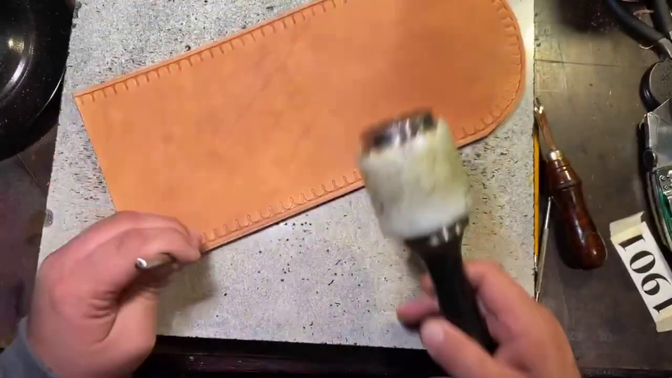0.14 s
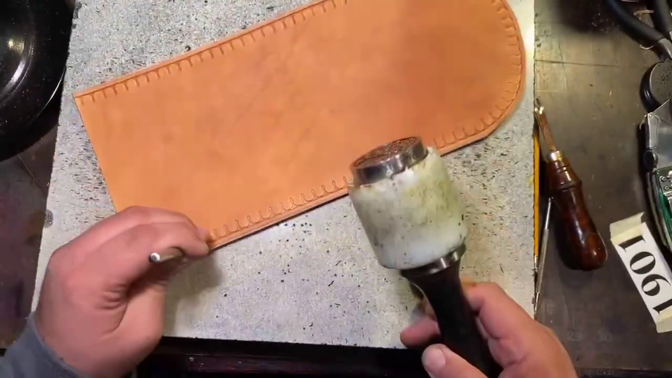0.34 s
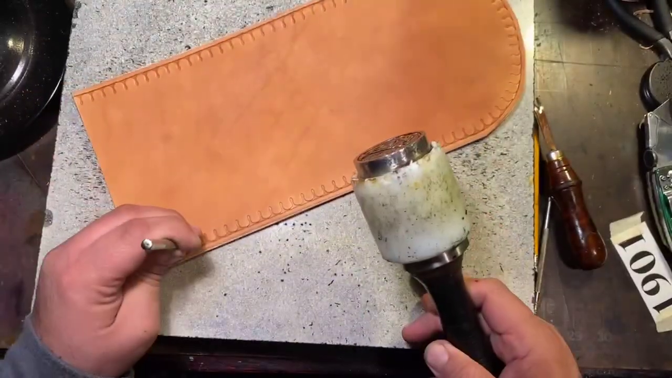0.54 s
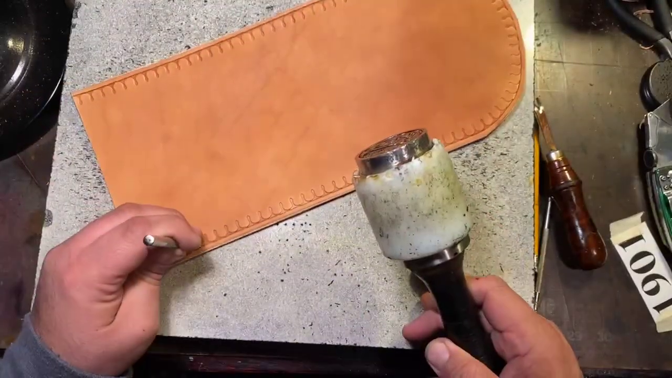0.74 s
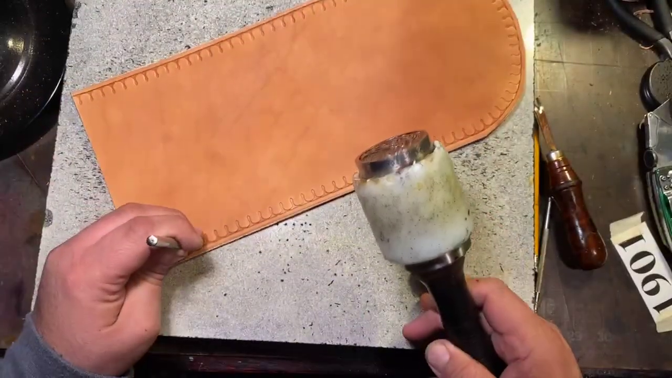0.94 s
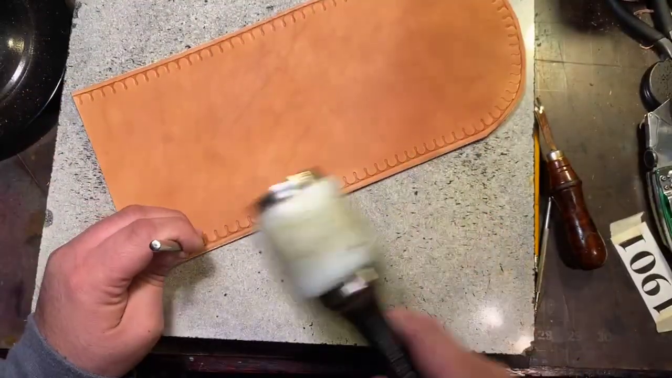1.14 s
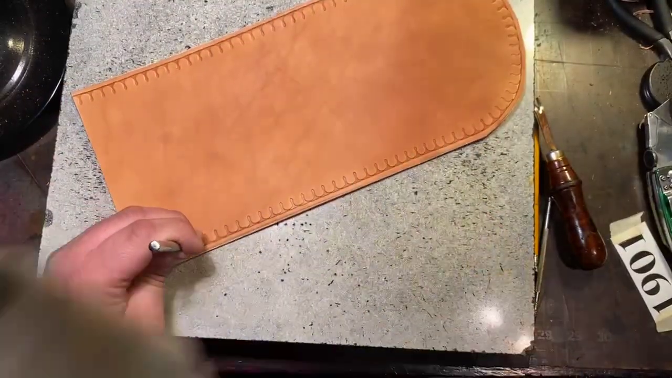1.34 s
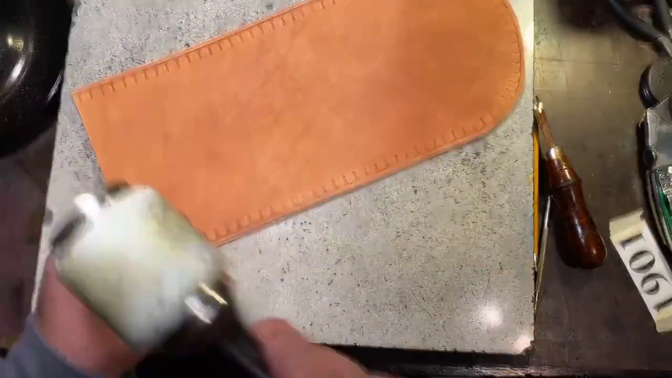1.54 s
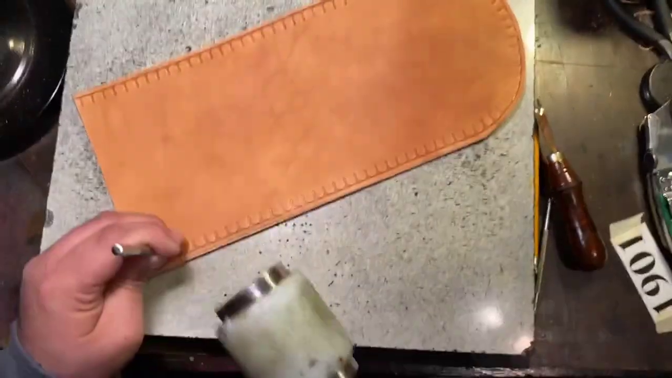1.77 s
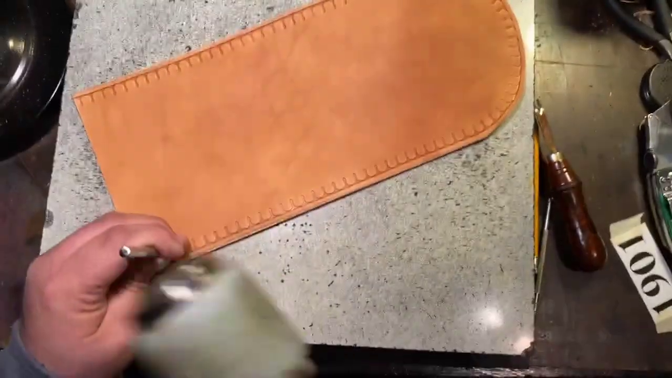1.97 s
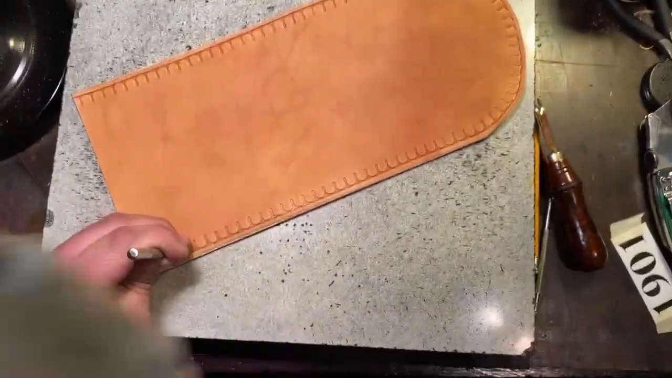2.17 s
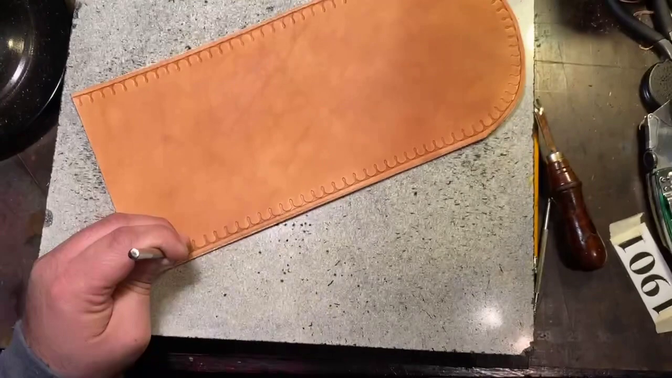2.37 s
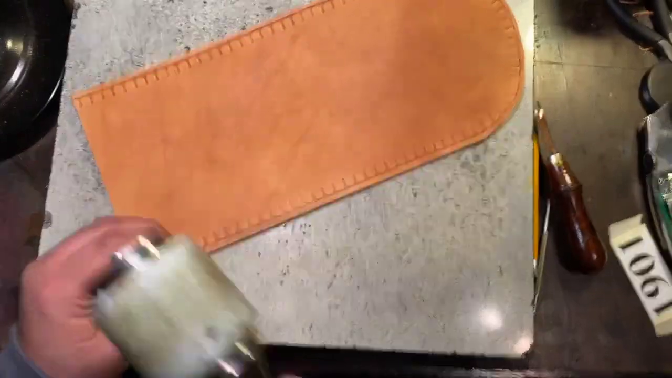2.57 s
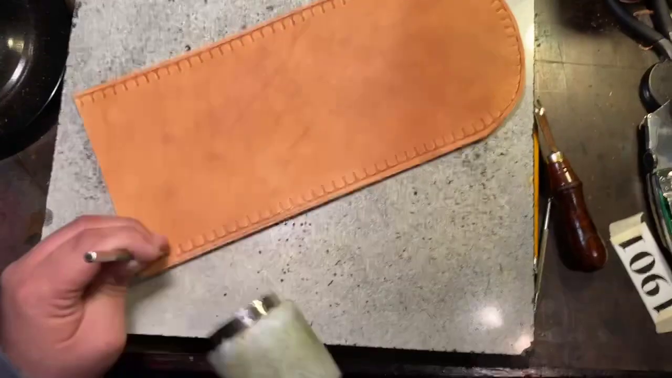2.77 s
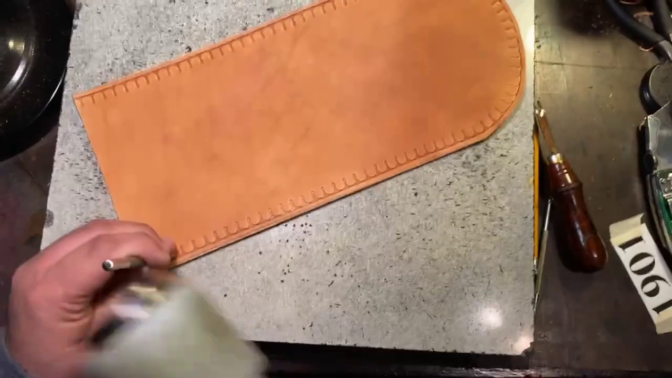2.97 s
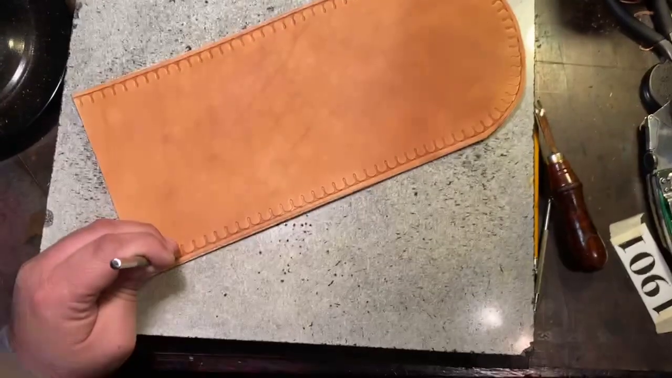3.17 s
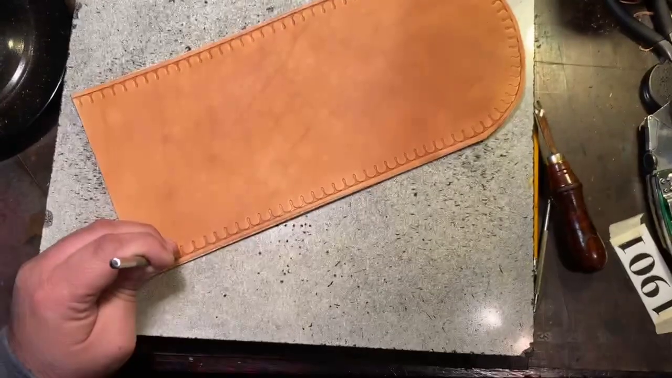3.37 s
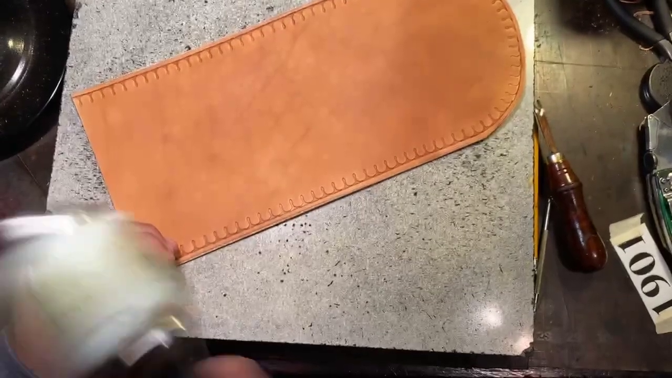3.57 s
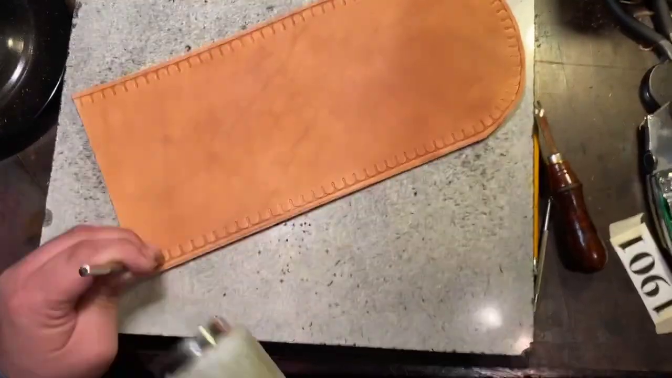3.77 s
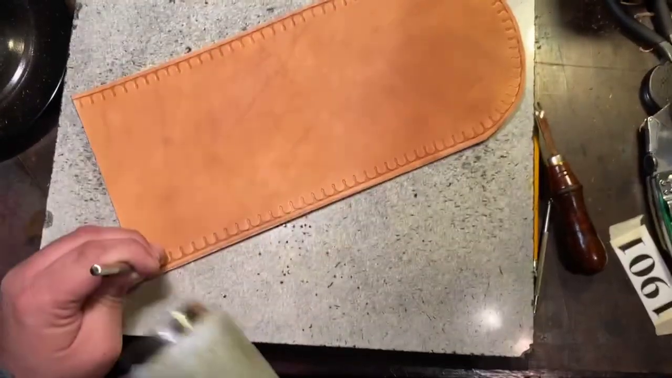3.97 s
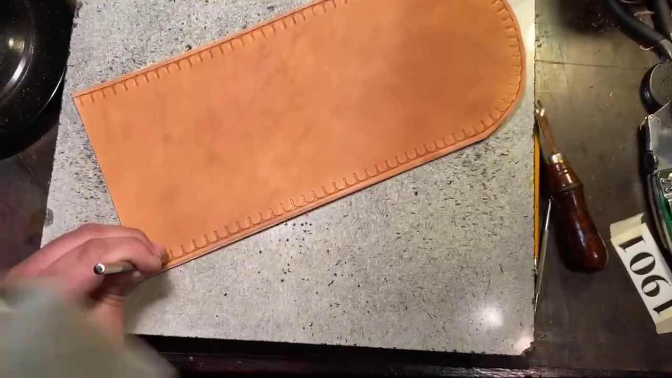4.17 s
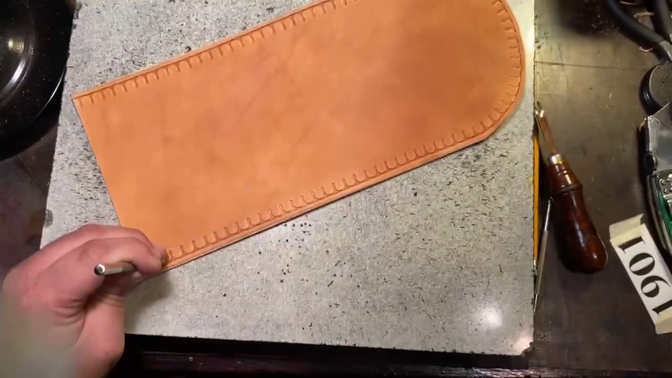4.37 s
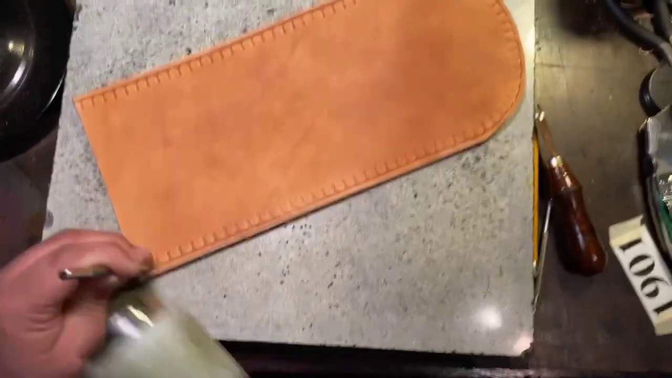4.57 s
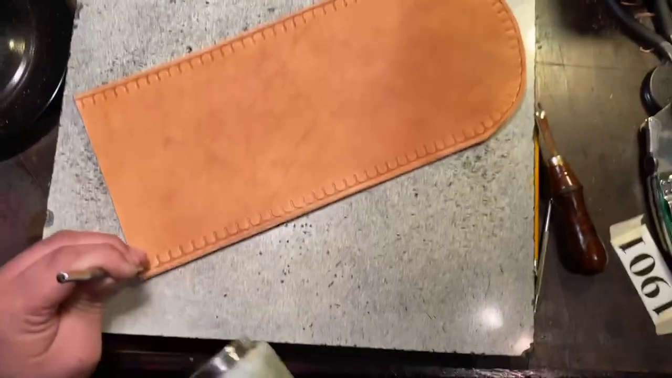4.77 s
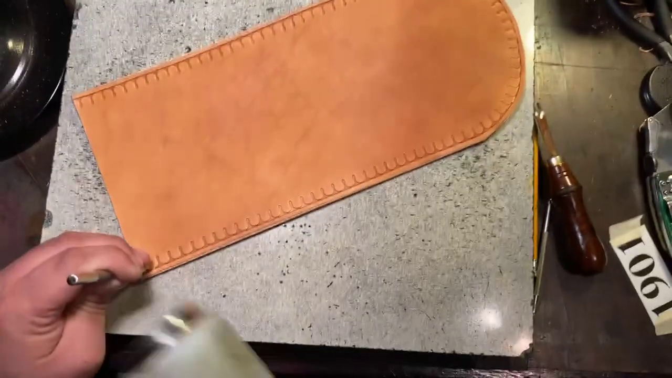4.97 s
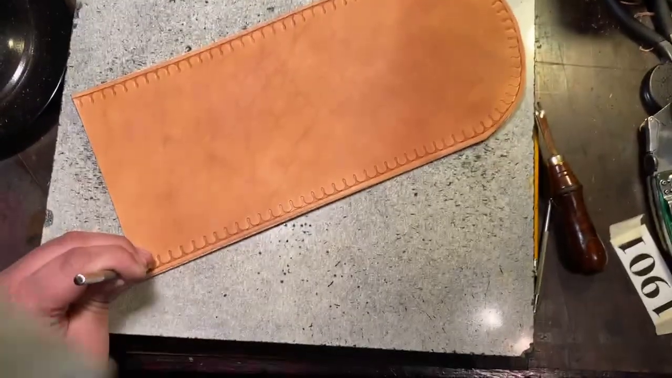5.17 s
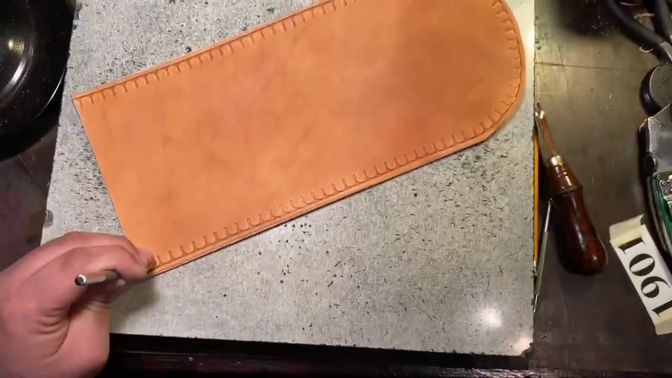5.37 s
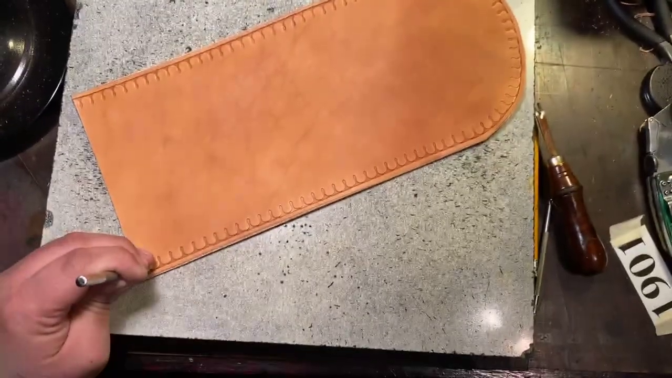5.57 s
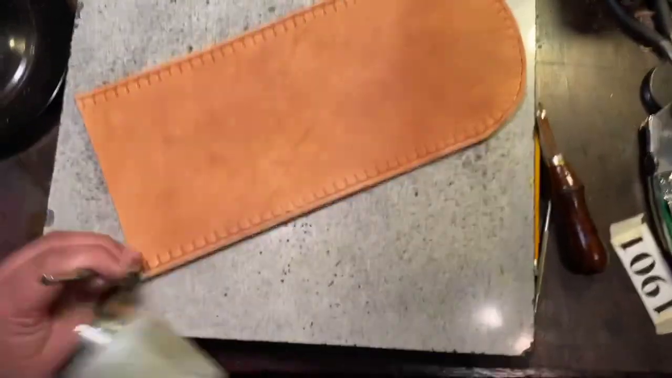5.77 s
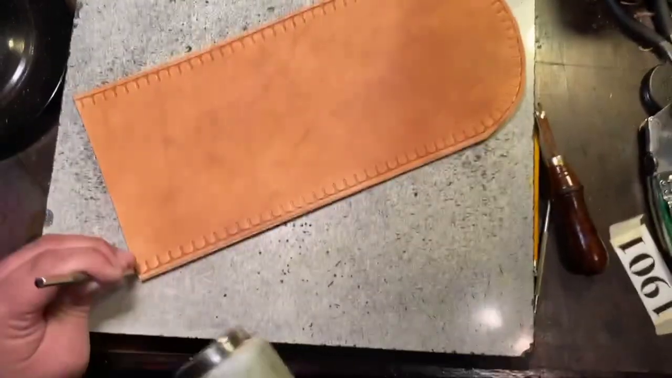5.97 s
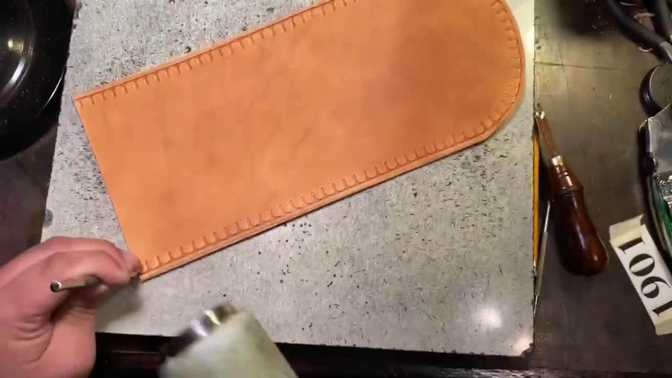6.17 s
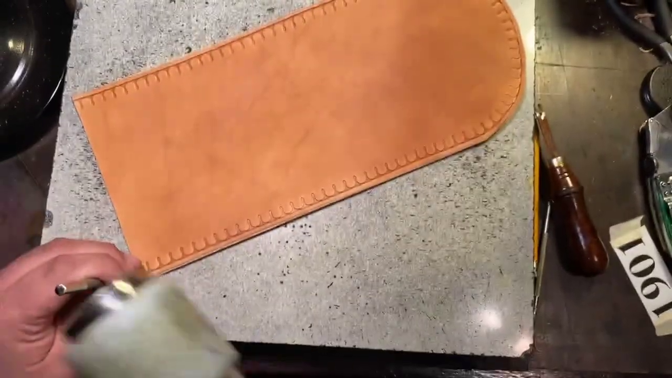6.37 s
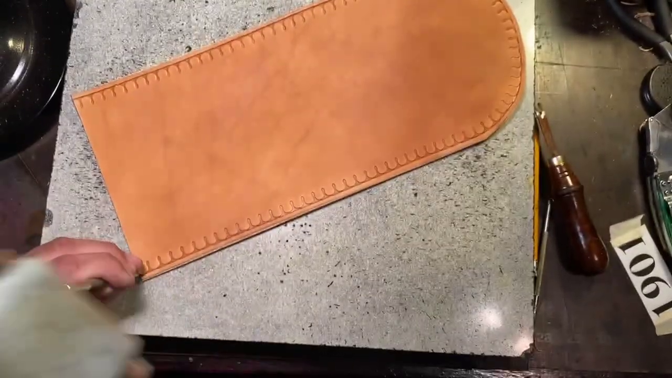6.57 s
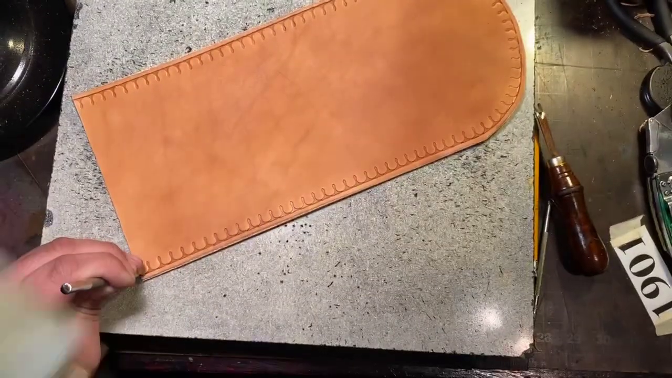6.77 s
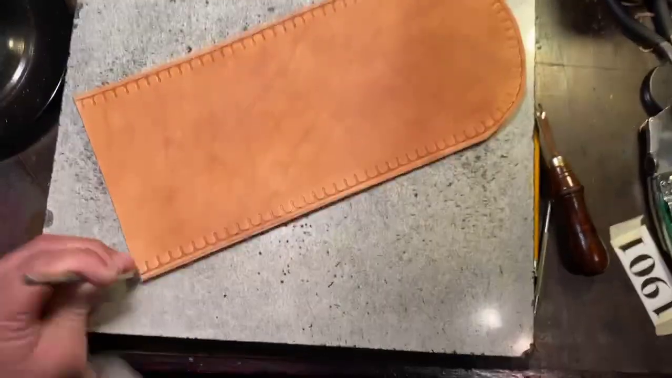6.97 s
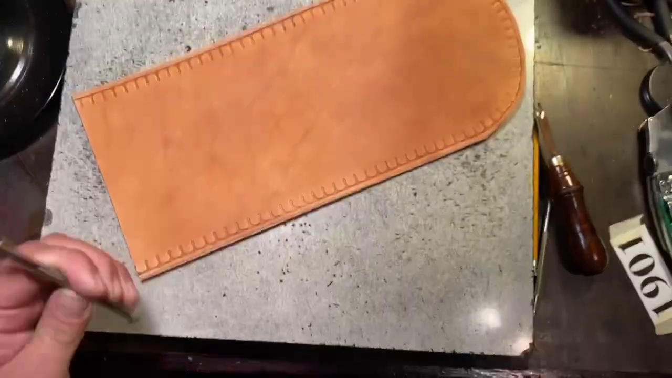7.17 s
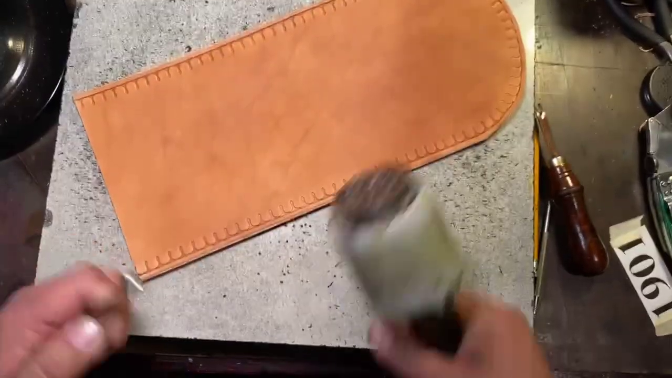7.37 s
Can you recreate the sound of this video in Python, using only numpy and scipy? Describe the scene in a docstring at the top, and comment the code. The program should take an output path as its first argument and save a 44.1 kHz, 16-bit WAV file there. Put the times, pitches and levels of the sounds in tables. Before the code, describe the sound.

Six steady, crisp hammer blows on a metal stamp over leather and stone, each with a bench thump and brief steel ring.

```python
"""A small workshop drones softly while hands shift a steel stamp on leather over a stone slab.
At about 1.4 s a sleeve swishes and the first of six maul (heavy hammer) blows lands, roughly one a second.
The stamp chirps as it bites, the slab cracks, steel rings, the bench knocks and thumps, loose tools
jingle and the room answers. Between the blows, and after the last, the hands move the stamp on."""
import sys
import numpy as np
from scipy import signal
from scipy.fft import rfft, irfft, next_fast_len
from scipy.io import wavfile

SR = 44100
rng = np.random.default_rng(int(sys.argv[2]) if len(sys.argv) > 2 else 0)


def dump_mix(stems):
    """Bounce the given channels to the path in sys.argv[1] as a 16-bit WAV at rate SR."""
    frames = np.atleast_2d(stems).T  # one column per channel
    limited = np.clip(frames, -1, 1)  # hard clip at full scale
    pcm = np.round(limited * 32767).astype(np.int16)
    wavfile.write(sys.argv[1], SR, pcm)


N = 327530
TIME = np.arange(N) / SR
AGE = np.arange(int(1.2 * SR)) / SR  # seconds since a hit
FFT_SIZE = next_fast_len(N)

def gain(db):
    """Turn decibels into a multiplier."""
    return 10 ** (np.asarray(db) / 20)

def unit(x):
    """Scale to an average power of 1."""
    return x / np.sqrt(np.mean(x ** 2))

def add(out, x, start_s):
    """Mix x into out from start_s on."""
    i = max(int(round(start_s * SR)), 0)
    out[i:i + len(x)] += x[:len(out) - i]

def bins(size):
    """The frequencies in a spectrum of this many samples."""
    return np.maximum(np.fft.rfftfreq(size, 1 / SR), 1)

def along(hz, points, values):
    """Read a curve between its points, on a pitch scale."""
    return np.interp(np.log(hz), np.log(points), values)

def fade(fade_s):
    """Die away by 60 dB in the fade time."""
    return np.exp(-np.log(1000) * AGE / fade_s)

def swell(rise_s):
    """Start smoothly."""
    return 1 - np.exp(-(AGE / rise_s) ** 2)

def hump(middle, length):
    """Rise and fall softly."""
    return np.exp(-(2 * (TIME - middle) / length) ** 2)

def ring(tones, rise_s):
    """A struck object's fading tones; neighbours swing in opposite directions."""
    return swell(rise_s) * sum((-1) ** k * gain(db) * fade(fade_s) * np.sin(2 * np.pi * hz * AGE)
                               for k, (hz, db, fade_s) in enumerate(tones))

def band_noise(hz, width, size=FFT_SIZE):
    """Noise gathered around one pitch, at most N samples long."""
    f = bins(size)
    spectrum = rfft(rng.standard_normal(size)) / (1 + ((f - hz ** 2 / f) / width) ** 2)
    return unit(irfft(spectrum, size))[:N]

def rubbing(strokes, band, hiss, hiss_db):
    """Soft strokes on a surface; band and hiss are each (pitch [Hz], width [Hz])."""
    surface = band_noise(*band) + gain(hiss_db) * band_noise(*hiss)
    return surface * sum(gain(db) * hump(s, length) for s, length, db in strokes)

# the air's tone colour (pitch [Hz], level [dB])
AIR_COLOUR = [(15, -61), (25, -30), (48, -1.5), (72, -1.5), (92, -22), (170, -2), (200, -18), (249, -4),
              (270, -16.5), (463, -19.5), (516, -27), (560, -23.5), (1940, -38.5), (2610, -39),
              (16000, -50.5)]
# the room's drone (pitch [Hz], width [Hz], level [dB])
DRONE_BANDS = [(60, 9, -59), (170.1, 15, -58.5), (239.4, 8, -65), (480, 20, -72.5), (8850, 530, -88)]
def room_tone(air_db=-54.5):
    """Soft air noise with a wavering drone."""
    colour = gain(along(bins(FFT_SIZE), *np.transpose(AIR_COLOUR)))
    air = unit(irfft(rfft(rng.standard_normal(FFT_SIZE)) * colour, FFT_SIZE))[:N]
    return gain(air_db) * air + sum(gain(db) * band_noise(hz, width) for hz, width, db in DRONE_BANDS)

# changes of grip (middle time [s], length [s], level [dB])
GRIP_STROKES = [(.1, 0.52, -66.5), (.8, 0.78, -75.5), (.88, 0.069, -74), (1.28, .2, -68.5),
                (3.27, 0.14, -68), (5.28, .1, -72), (6.53, 0.16, -64)]
def hand_rustle():
    """The hands rub as they shift their grip."""
    return rubbing(GRIP_STROKES, band=(1600, 3200), hiss=(8000, 9000), hiss_db=-12)

# moves of the stamp (middle time [s], length [s], level [dB])
SLIDE_STROKES = [(.1, 0.42, -74.5), (3.3, .4, -73), (4.29, 0.13, -73), (5.4, 0.27, -73.5),
                 (5.97, 0.14, -73.5), (7.03, 0.12, -71), (7.32, .18, -77.5)]
def leather_slide():
    """The stamp slides over the leather to its next place."""
    return rubbing(SLIDE_STROKES, band=(5960, 1200), hiss=(5500, 8000), hiss_db=-2.5)

# faint squeaks (middle time [s], length [s], pitch [Hz], level [dB])
STAMP_SQUEAKS = [(0.463, 0.15, 366, -55.5), (4.843, 0.18, 2950, -75), (4.933, .16, 2200, -67.5),
                 (4.938, .09, 831, -66)]
def squeaks():
    """Thin, wavering tones as the stamp is set in place."""
    waver = np.cumsum(band_noise(7.2, 5.2)) / SR
    return sum(gain(db) * hump(s, length) * np.sin(2 * np.pi * hz * (TIME + .0058 * waver))
               for s, length, hz, db in STAMP_SQUEAKS)

# maul blows (time [s], strength [dB], stiffness under the stamp [0-1], shank ring [dB],
# bite length [s], bite level [dB], sleeve swish [dB])
MAUL_BLOWS = [(1.4442, 1, 0.03, -.5, 0.0017, 1.5, -64), (2.4364, .5, .08, -1, 0.0033, .5, -59.5),
              (3.491, 0.5, 0.17, 0.5, .0065, -3.5, -69), (4.375, 1.5, .18, 1.5, .0022, -8.5, -71),
              (5.5812, 1, 0.02, 1.5, 0.0055, -4.5, -73.5), (6.755, -0.8, 0.94, 0, 0.0038, -17, -70)]
def maul_blows(roughness, echo_s=.0077, echo_db=-6, repeat_share=.3):
    """Each swing and hit; stiffness under the stamp keeps the blow in the maul and out of the bench."""
    out = roughness * sleeve_swish()
    walls = rng.standard_normal(len(AGE))
    for s, db, stiffness, shank_db, bite_s, bite_db, _ in MAUL_BLOWS:
        knock_db = np.interp(stiffness, [0, 1], [1.5, -9])
        jingle_db = np.interp(stiffness, [0, 1], [1, -16.5])
        clank_db = np.interp(stiffness, [0, 1], [-28, 5])
        crack_db = np.interp(stiffness, [0, 1], [-3, -5])
        add(out, gain(db - 16 + bite_db) * stamp_chirp(bite_s), s - .02)
        crack = gain(db + crack_db) * slab_crack(knock_db)
        add(out, crack, s - .0003)
        clack = gain(bite_db) * stamp_clack()
        clank = gain(clank_db) * maul_clank()
        steel = clack + clank + gain(shank_db) * shank_ring()
        add(steel, gain(jingle_db) * tool_jingle(), .017)
        add(out, gain(db - 1) * ringing_in_room(steel), s)
        add(out, gain(db) * (gain(knock_db) * bench_knock() + frame_thump()), s)
        add(out, gain(echo_db) * crack, s + echo_s)  # off the nearest wall
        add(out, gain(db + echo_db) * (clack + gain(-5) * clank), s + echo_s)
        # some echoes repeat from blow to blow; the moving arms change the rest
        fresh = rng.standard_normal(len(AGE))
        echoes = np.sqrt(repeat_share) * walls + np.sqrt(1 - repeat_share) * fresh
        add(out, gain(db - 19) * room_answer(echoes, 1.4 * shank_db, knock_db), s + .0018)
    return out

def sleeve_swish(lead_s=.06, length_s=.13):
    """The sleeve swishes as the arm comes down."""
    swings = [(s - lead_s, length_s, db) for s, *_, db in MAUL_BLOWS]
    return rubbing(swings, band=(1250, 1600), hiss=(5000, 6000), hiss_db=-9)

def stamp_chirp(bite_s, hz=3985, wobble_hz=300, graze_s=.014, graze_db=-16):
    """The maul grazes the stamp, then slips harder on it just before the crack."""
    size = int(.025 * SR)
    time_left = .02 - AGE[:size]  # until the blow lands
    slip_hz = hz + wobble_hz * band_noise(400, 1100, size)  # unsteady sticking and slipping
    slip = np.sqrt(2) * np.sin(2 * np.pi * np.cumsum(slip_hz) / SR)
    slip += gain(-11) * band_noise(5700, 2000, size)
    stop = np.clip(1 + time_left / .0013, 0, 1)
    graze, bite = (np.clip((span - time_left) / .0015, 0, 1) * stop for span in (graze_s, bite_s))
    push = gain(-17) * graze * band_noise(650, 970, size)
    rub = slip * (bite + gain(graze_db) * graze) + push
    return signal.sosfilt(signal.butter(6, 7800, fs=SR, output="sos"), rub)

# the crack's tone colour (pitch [Hz], level [dB])
CRACK_COLOUR = [(150, -4.5), (400, -4.5), (650, 4), (880, 1), (1100, -4.5), (1650, 3.5), (2100, -4),
                (2450, -1.5), (3350, -9.5), (3850, -4), (4800, -12.5), (7000, -19), (10000, -29.5),
                (16000, -37)]
def slab_crack(knock_db, spread_s=.002199):
    """A sharp click; waves bending the slab carry the highs out first and the lows later."""
    f = bins(len(AGE))
    body_db = knock_db * along(f, [250, 450, 930, 1400], [0, 1, 1, 0])
    # build a click of this colour with its energy packed at the start
    cepstrum = irfft(np.log(gain(along(f, *np.transpose(CRACK_COLOUR)) + body_db)))
    cepstrum[1:] *= 2
    cepstrum[len(cepstrum) // 2:] = 0
    lows_late = np.exp(-4j * np.pi * spread_s * np.sqrt(1000 * f) + 2j * np.pi * f * spread_s / 4)
    click = np.exp(rfft(cepstrum)) * lows_late
    hits = rng.standard_normal(len(AGE)) * fade(.02) * swell(.00051)  # waves bounce off the edges
    hits *= gain(-6) / np.linalg.norm(hits)
    hits[0] += 1  # the main hit
    hits[round(.0025 * SR)] += gain(-7)  # the stamp bottoms out again
    return irfft(click * rfft(hits))[:len(AGE) // 2] / np.abs(irfft(click)).max()

# the stamp's tones (pitch [Hz], level [dB], fade time [s])
STAMP_TONES = [(3770, -13.5, 0.013), (3938, -10.5, 0.017), (4150, -15, .018), (4430, -15, .028)]
def stamp_clack():
    """The stamp rings very briefly as it bites."""
    return ring(STAMP_TONES, rise_s=.0004)

# the maul head's tones (pitch [Hz], level [dB], fade time [s])
MAUL_TONES = [(1400, -22, .04), (1640, -19, .054), (1860, -24, .04), (2722, -23, .11), (2920, -20, .06),
              (3100, -26.5, .1), (3323, -19, .075), (3430, -23, .05), (4797, -34, .11)]
def maul_clank():
    """The maul's head rings from the hit."""
    return ring(MAUL_TONES, rise_s=.001)

# the shank's tones (pitch [Hz], level [dB], fade time [s])
SHANK_TONES = [(6230, -35, .17), (6270, -41, 0.28), (8400, -47.5, 0.21), (12000, -51.5, .19),
               (12600, -47, .24), (15280, -51, .19), (15440, -50, .2)]
def shank_ring():
    """The stamp's thin steel stem, its shank, rings high."""
    return ring(SHANK_TONES, rise_s=.0036)

# tones of the slab and bench top (pitch [Hz], level [dB], fade time [s])
BENCH_TONES = [(215.7, -26, 0.26), (255, -22.5, 0.23), (305, -16, 0.24), (335.5, -18.5, 0.27),
               (393.6, -22, .17), (439, -19.5, 0.24), (461, -20, .16), (496.5, -16, 0.22),
               (557.5, -26, 0.29), (595, -18.5, .18), (675.5, -22, 0.17), (757.5, -20.5, .15),
               (771, -27, 0.12), (844.5, -16, .16), (888.4, -15.5, 0.14), (964, -31, 0.23),
               (1056, -25, .15), (1283, -30, 0.096), (1410, -30.5, .15), (1614, -29.5, 0.099),
               (1784, -28, 0.17), (3570, -33.5, 0.17), (3800, -31.5, 0.17), (3770, -25.5, .15),
               (3990, -31.5, 0.1), (4350, -34, 0.13)]
def bench_knock():
    """The slab and bench top shake together."""
    return ring(BENCH_TONES, rise_s=.0045)

def ringing_in_room(steel, echo_db=-11):
    """The walls keep the steel's tones alive, smeared and uneven."""
    walls = rng.standard_normal(len(AGE)) * fade(.21) * swell(.018)
    return steel + gain(echo_db) * signal.fftconvolve(steel, walls / np.linalg.norm(walls))[:len(steel)]

# the workshop's echo (pitch [Hz], level [dB], fade time [s])
ROOM_BANDS = [(35, -29, 0.82), (80, -8, 0.97), (150, -6.5, 0.9), (282, -9.5, .35), (550, -4, .38),
              (920, -5.5, 0.31), (1300, -8, .3), (2500, -10.5, .26), (3280, -15, 0.3), (3830, -12, 0.28),
              (4988, -18.5, .26), (6600, -17.5, .255), (10150, -27.5, .245), (15500, -36.5, 0.21)]
def room_answer(echoes, hiss_db, knock_db):
    """Many echoes blur together; each band fades at its own rate, the lows last."""
    hz, db, fade_times = np.transpose(ROOM_BANDS)
    f = bins(len(AGE))
    tint_db = hiss_db * along(f, [5000, 11000], [0, 1])
    tint_db += .4 * knock_db * along(f, [120, 300, 900, 3000], [0, 1, 1, 0])
    spectrum = rfft(echoes) * unit(gain(along(f, hz, db))) * gain(tint_db)
    return swell(.0035) * sum(irfft(spectrum * along(f, hz, band)) * fade(fade_s)
                              for band, fade_s in zip(np.eye(len(hz)), fade_times))

# the bench frame's tones (pitch [Hz], level [dB], fade time [s], delay [s], rise time [s])
FRAME_TONES = [(68.5, -24, 0.33, .011, 0.0073), (125, 8.5, .04, .004, .009),
               (133.4, -10, .19, .0045, 0.0085), (147, -26, 0.26, .03, 0.015),
               (159, -24, 0.23, 0.0073, 0.0033), (190.2, -17, 0.17, 0.0034, .004),
               (102.5, -21, 0.28, .011, 0.0039), (296, -8.5, 0.044, .002, 0.0021),
               (59.1, -34.5, 1.2, 0.0083, .03), (72.4, -36.5, 0.46, 0.043, 0.044),
               (95.6, -35, 0.51, 0.059, .04)]
def frame_thump():
    """The heavy frame bounces under the slab and gets going late."""
    out = np.zeros(len(AGE))
    for hz, db, fade_s, delay_s, rise_s in FRAME_TONES:
        add(out, ring([(hz, db, fade_s)], rise_s), delay_s)
    return out

# the tools' tones (pitch [Hz], level [dB], fade time [s])
TOOL_TONES = [(2287, -25.5, 0.18), (2317, -28, 0.13), (2390, -23, .12), (2467, -19, 0.11),
              (2586, -24, 0.12), (2350, -58, 1)]
def tool_jingle():
    """Loose steel tools ring as they land after a hop."""
    return ring(TOOL_TONES, rise_s=.0012)

# rustles on the bench (middle time [s], level [dB])
SETTLE_TIMES = [(1.605, -45), (5.73, -49.5)]
def settling(length_s=.082):
    """Loose things settle after the blows that shake the bench most."""
    return band_noise(1000, 530) * sum(gain(db) * hump(s, length_s) for s, db in SETTLE_TIMES)

def scene():
    """Room, hands and blows at one microphone."""
    roughness = gain(.6 * band_noise(30, 60))  # makes all rubbing slightly uneven
    rustles = roughness * (hand_rustle() + leather_slide() + settling())
    return (room_tone() + rustles + squeaks() + maul_blows(roughness))[None]

def record(dry, low_cut_hz=45, high_cut_hz=15700):
    """Drop the deepest bass, round off the loudest peaks and cut the very top."""
    thin = irfft(rfft(dry, 2 * N) / np.sqrt(1 + (low_cut_hz / bins(2 * N)) ** 8))[:, :N]
    rounded = thin / (1 + thin ** 4) ** (1 / 4)
    return signal.sosfilt(signal.ellip(8, .2, 70, high_cut_hz, fs=SR, output="sos"), rounded)

dry = scene()
out = record(dry)
dump_mix(out)
```